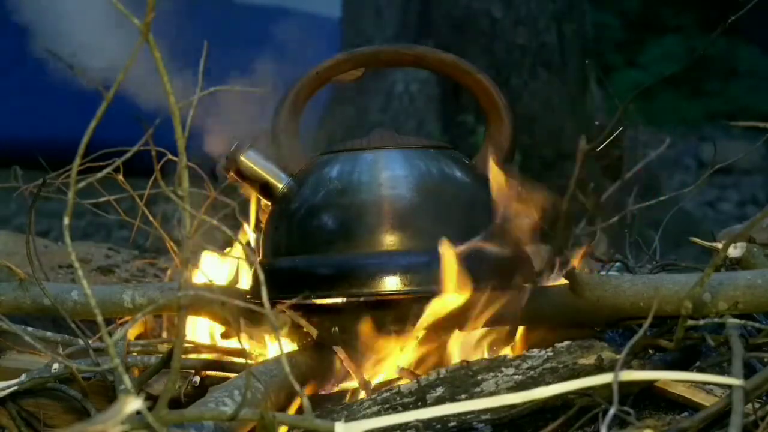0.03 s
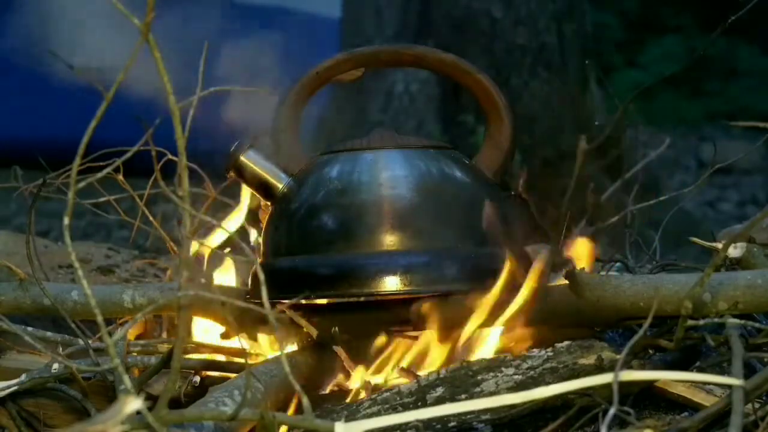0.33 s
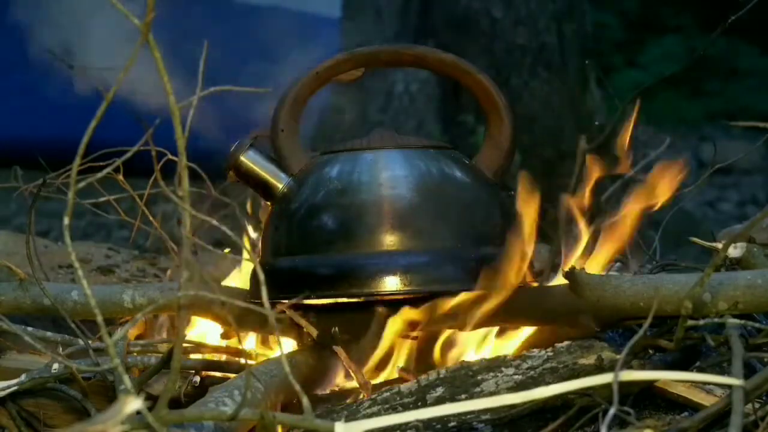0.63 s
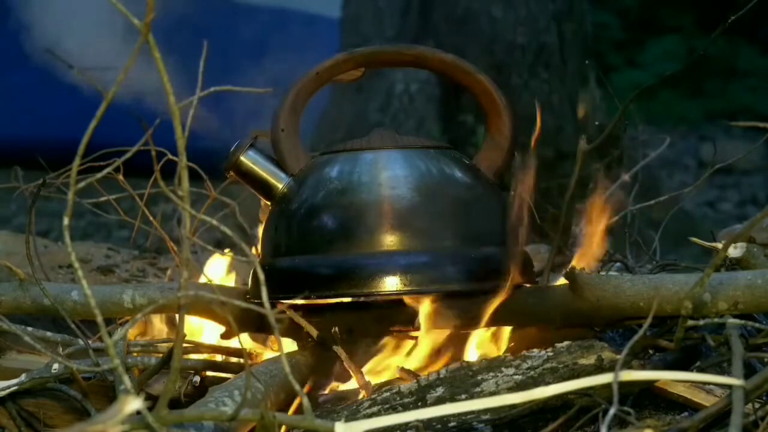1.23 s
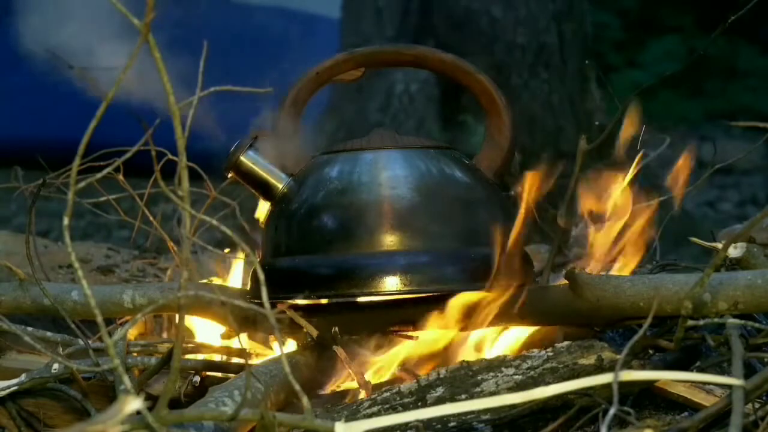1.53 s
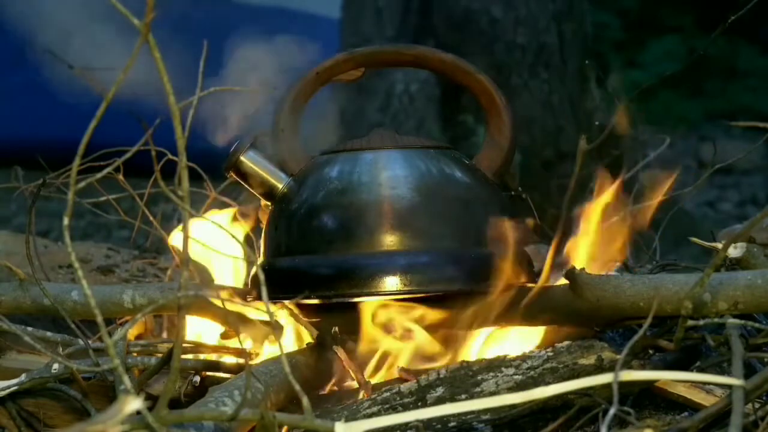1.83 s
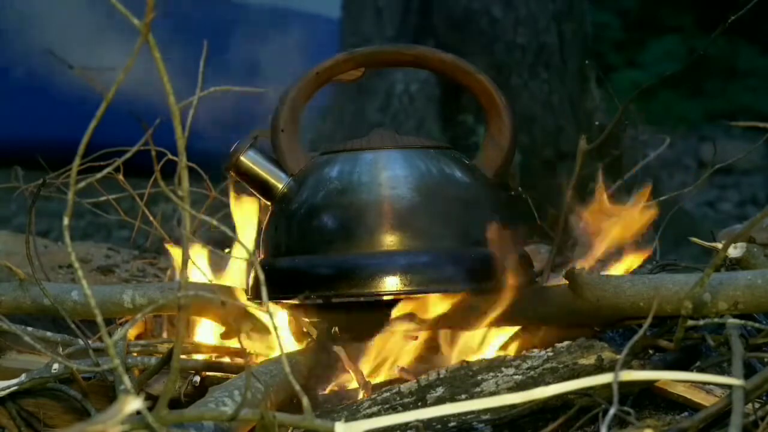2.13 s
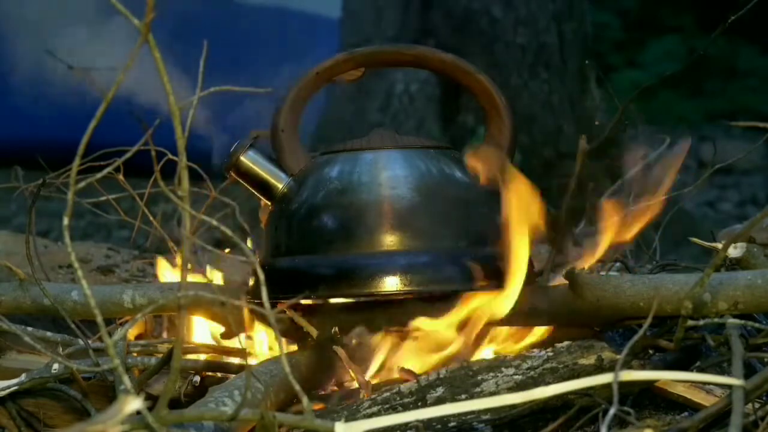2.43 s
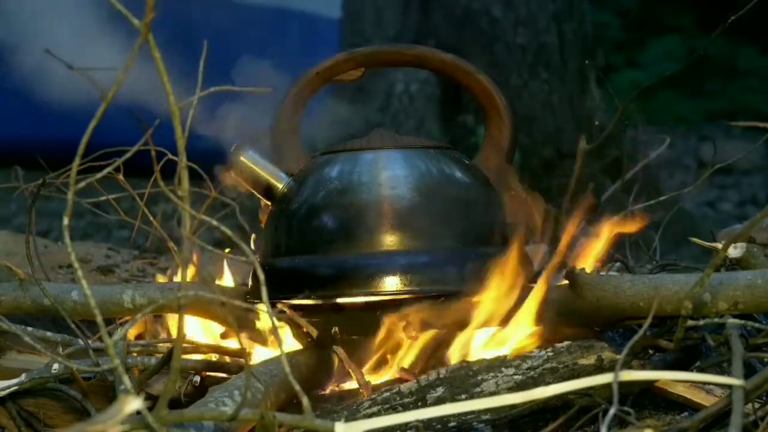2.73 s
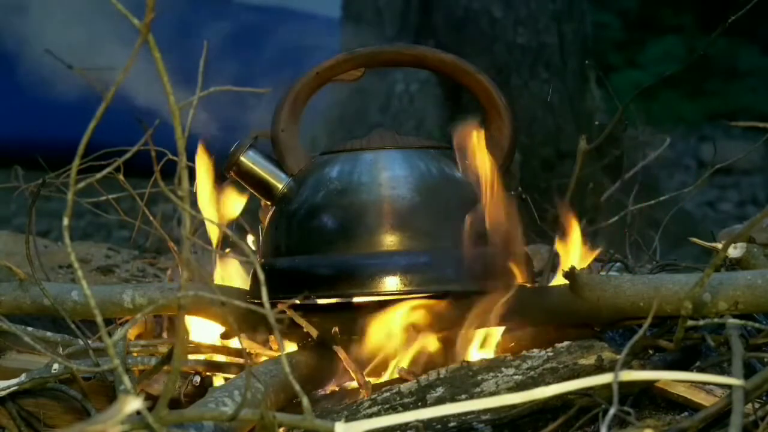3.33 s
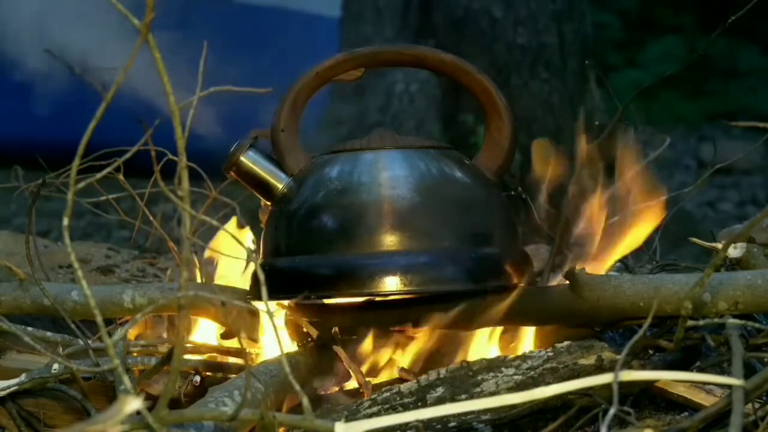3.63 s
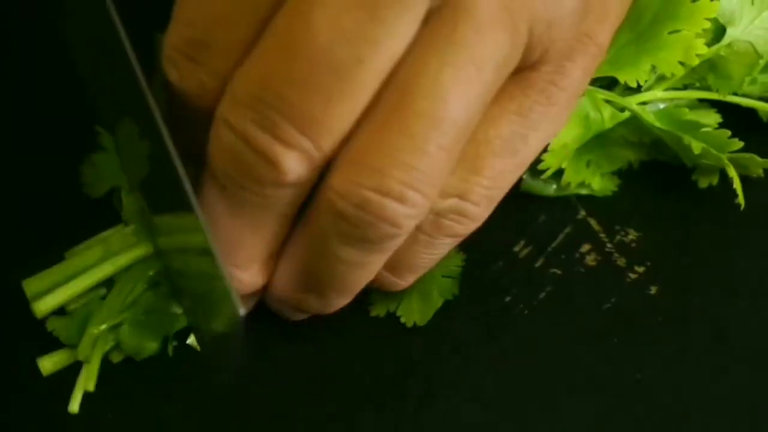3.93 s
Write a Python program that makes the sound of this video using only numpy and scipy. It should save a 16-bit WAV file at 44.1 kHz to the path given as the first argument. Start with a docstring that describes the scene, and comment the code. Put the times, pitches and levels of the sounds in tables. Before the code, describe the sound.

Outdoors, a boiling kettle holds a shrill whistle that wanders in pitch, with hiss and a few brief spits of steam. A campfire rumbles and crackles faintly below it, and everything gets louder just before the end.

```python
"""Outdoors on a campfire, a steel kettle whistles as steam rushes through the cap on its spout.
The flow surges and sags, so the tone wanders around 3 kHz. Harder flow makes it higher, louder and
hoarser, with more hiss and a rasp halfway between the overtones. Now and then wet steam spits.
Below it the flames rumble softly and twigs crackle; the level steps up just before the end."""
import sys
import numpy as np
from scipy import signal
from scipy.fft import rfft, irfft, next_fast_len
from scipy.io import wavfile
from scipy.ndimage import map_coordinates

SR = 44100
rng = np.random.default_rng(int(sys.argv[2]) if len(sys.argv) > 2 else 0)


def wrap_up_sound(samples):
    """Save the sound to the file named by the first command line argument, as 16-bit audio."""
    columns = np.atleast_2d(samples).T
    # keep every value between -1 and 1, then stretch to whole-number steps
    tamed = np.clip(columns, -1, 1)
    steps = np.round(tamed * 32767).astype(np.int16)
    wavfile.write(sys.argv[1], SR, steps)


N = 176400  # 4 seconds


def amp(db):
    """Turn decibels into a gain."""
    return 10 ** (np.asarray(db) / 20)


def unit(x):
    """Scale a signal to an average power of 1."""
    return x / np.sqrt(np.mean(np.abs(x) ** 2) + 1e-20)


def read(rows, at):
    """Look up `at` in a table's first column; give the other columns, joined by straight lines."""
    key, *columns = np.transpose(rows)
    return [np.interp(at, key, column) for column in columns]


def wobble(rate):
    """A smooth curve through `rate` random points a second, mostly between -1 and 1."""
    return map_coordinates(rng.standard_normal(N // 8), [np.arange(N) * rate / SR], mode="wrap")


def filtered(x, gain_at):
    """Turn each frequency of x up or down by gain_at(hz)."""
    size = next_fast_len(N + SR // 2)
    return irfft(rfft(x, size) * gain_at(np.fft.rfftfreq(size, 1 / SR)), size)[..., :N]


def pan(lean_db):
    """Left and right gains that make the left ear lean_db louder."""
    return amp(np.array([[.5], [-.5]]) * lean_db)


def white(side_db=-12.5):
    """Plain noise, nearly the same in both ears."""
    mid, side = rng.standard_normal((2, N))
    return np.array([mid + amp(side_db) * side, mid - amp(side_db) * side])


def noise(colour):
    """Stereo noise shaped by a table of (frequency [Hz], relative level [dB])."""
    freqs, db = np.transpose(colour)
    return unit(filtered(white(), lambda hz: amp(np.interp(np.log(hz + 1), np.log(freqs), db))))


def noise_band(phase, width_hz, edge_hz=266):
    """A narrow band of noise that follows a moving pitch and falls off faster beyond edge_hz."""
    shape = lambda hz: 1 / np.sqrt((1 + (hz / width_hz) ** 2) * (1 + (hz / edge_hz) ** 4))
    return unit(filtered(white(), shape) * np.cos(phase) + filtered(white(), shape) * np.sin(phase))


def whistle(t, pitch, phase):
    """Steam sounds a clean tone and its overtones in the spout cap; the highest sputter most."""
    # strength of the tones at 1, 2 and 3 times the pitch (time [s], level [dB])
    first_level = [(0.0, -23.5), (0.1, -20.5), (0.18, -26), (0.6, -24.5), (0.63, -27), (0.84, -23),
                   (1.06, -27.5), (1.12, -24.5), (1.25, -27), (1.49, -22), (1.59, -26), (1.74, -23.5),
                   (1.86, -24.5), (1.91, -21.5), (2.02, -26.5), (2.19, -21.5), (2.69, -25.5), (2.82, -22),
                   (2.89, -26.5), (3.09, -23), (3.24, -25.5), (3.35, -23), (3.42, -27.5), (3.73, -24),
                   (3.79, -26), (3.92, -25)]
    second_level = [(0.0, -33), (0.04, -31), (0.05, -43), (0.14, -32), (0.34, -36), (0.37, -31),
                    (0.71, -37), (0.73, -31.5), (1.18, -33.5), (1.23, -31), (1.53, -37), (1.66, -33.5),
                    (1.7, -38.5), (1.86, -31.5), (1.91, -39), (1.94, -30.5), (2.08, -32.5), (3.32, -32.5),
                    (3.33, -38.5), (3.47, -41), (3.49, -57), (3.53, -41.5), (3.57, -48.5), (3.6, -33),
                    (3.76, -30.5), (3.92, -33.5)]
    third_level = [(0.0, -37.5), (0.12, -35.5), (0.24, -42.5), (0.29, -37.5), (1.03, -42.5), (1.09, -34),
                   (1.31, -38), (1.41, -35.5), (1.56, -41.5), (1.62, -37.5), (2.49, -38.5), (2.51, -47),
                   (2.6, -42), (2.63, -49), (2.71, -39.5), (3.1, -36), (3.35, -41.5), (3.47, -54.5),
                   (3.5, -44), (3.67, -35), (3.76, -39.5), (3.92, -42.5)]
    # tones at 3, 4 and 5 times the pitch (level above third_level [dB], sputter [dB])
    upper_tones = [(-0.5, 1.1), (-18.5, 2.5), (-27, 3.5)]
    # how much louder the left ear is (pitch [Hz], first tone [dB], second tone [dB])
    lean = [(2820, 1.2, 2), (2986, 2.4, -0.5), (3082, -1.5, 5), (3130, -1, -3.5), (3280, -6.5, -2),
            (3170, -3, 2)]
    first_lean, second_lean = read(lean, pitch)
    left_lead = 0.31 * np.array([[.5], [-.5]])  # radians: the left ear's wave comes a little early
    tone = lambda multiple, db: amp(db) * np.sqrt(2) * np.sin(multiple * phase + left_lead)
    first_db = read(first_level, t)[0] + 0.42 * wobble(40)
    second_db = read(second_level, t)[0] + 1 + 0.68 * wobble(60)
    sound = pan(first_lean) * tone(1, first_db) + pan(second_lean) * tone(2.0002, second_db)
    for multiple, (offset_db, sputter_db) in enumerate(upper_tones, 3):
        sway = pan(3 * wobble(7.3))
        level_db = read(third_level, t)[0] + offset_db + sputter_db * wobble(35.03)
        sound += sway * tone(multiple, level_db)
    shimmer = amp(0.5 * wobble(170))
    return sound * shimmer


def hoarseness(surge_db, phase):
    """Swirling steam blurs each tone; at high flow a flickering rasp grows halfway between them."""
    # breathy noise around 1, 2, 3, 4 and 5 times the pitch, at usual flow (level [dB])
    blur_levels = [-51, -47, -53, -61, -74]
    # rasp at 1.5, 2.5, 3.5 and 4.5 times the pitch, at usual flow (level [dB])
    rasp_levels = [-54, -45, -52, -62.5]
    blur = sum(amp(db) * noise_band(k * phase, width_hz=76) for k, db in enumerate(blur_levels, 1))
    rasp = sum(amp(db) * noise_band((k + .5) * phase, width_hz=55)
               for k, db in enumerate(rasp_levels, 1))
    rasp_db = 1.53 * surge_db + 2.8 * wobble(90)
    return blur * amp(.5 * surge_db) + rasp * amp(rasp_db)


def steam_hiss(surge_db, spit_gain):
    """The jet hisses louder the more it swirls, and flares with each spit."""
    # tone colour of the hiss (frequency [Hz], relative level [dB])
    colour = [(150, -33), (380, -21), (2100, -26), (2700, -6.5), (3400, 4), (4050, -18), (4700, -8.5),
              (5100, -6), (5500, -12), (6100, -6), (6750, -18), (7250, -4.5), (7900, 2), (8600, -3),
              (9900, -7), (10900, -5.5), (12700, -24), (14000, -10), (15400, -30)]
    flow_gain = amp(-44.5 + 1.05 * surge_db + .6 * wobble(47))
    return noise(colour) * np.hypot(flow_gain, spit_gain)  # hypot adds their powers


def flames(t):
    """Fluttering flames make a low rumble, the same in both ears."""
    # tone colour of the rumble (frequency [Hz], relative level [dB])
    colour = [(20, -22), (50, -10), (80, 2), (115, -5), (170, -14.5), (400, -30)]
    # strength of the flames (time [s], level [dB])
    level = [(0, -70), (.7, -74), (1.1, -68.5), (2.35, -73.5), (2.6, -64.5), (3, -69), (3.4, -65.5),
             (4, -63.5)]
    rumble = unit(noise(colour).mean(axis=0))
    return rumble * amp(read(level, t)[0] + 2.2 * wobble(9.16))


def soft_rush(t, pitch):
    """The steam cloud and the fire rush softly, with a puff whenever the cloud thickens."""
    # tone colour of the rush (frequency [Hz], relative level [dB])
    colour = [(40, -10), (200, -4), (400, -1), (800, -3), (1400, -3.5), (2100, -3.5), (8000, -22)]
    # puffs of steam (time [s], level [dB])
    puffs = [(.09, -69), (1.73, -61.5), (2.14, -65), (3.12, -68), (3.81, -68.5)]
    puff_width_s, rest_hz, db_per_hz = 0.09, 3050, 0.0128
    puff_gain = sum(amp(db) * np.exp(-((t - peak_s) / puff_width_s) ** 2) for peak_s, db in puffs)
    flow_db = -68 + db_per_hz * (pitch - rest_hz)  # a higher pitch means more steam
    return noise(colour) * np.hypot(puff_gain, amp(flow_db + .9 * wobble(38)))


def crackles(t, per_second=15, fade_s=0.0034):
    """Burning twigs pop at random; each pop is a burst of noise that falls 60 dB in fade_s."""
    # tone colour of a pop (frequency [Hz], relative level [dB])
    colour = [(200, -27), (1200, 21), (6000, -2), (15000, -19)]
    pops = rng.random(N) < per_second / SR
    pop_db = -69.5 + 6 * np.minimum(rng.exponential(size=N), 3)  # most are faint, a few stand out
    fade = amp(-60 * t[:SR // 10] / fade_s)
    return signal.fftconvolve(pops * amp(pop_db), fade)[:N] * noise(colour)


def spits(t, rise_s=.0006, fade_s=.06):
    """Wet steam spits in the spout: jumps of gain for the hiss, each falling 60 dB in fade_s."""
    # spits of wet steam (time [s], level [dB])
    bursts = [(.98, -38), (1.262, -45), (1.519, -38), (2.12, -29), (2.168, -40), (3.067, -32.5),
              (3.807, -36)]
    gain = np.zeros(N)
    for start_s, db in bursts:
        age = np.maximum(t - start_s, 0)
        gain += amp(db - 60 * age / fade_s) * (1 - np.exp(-age / rise_s))
    return gain


def scene():
    """The steam drives the whistle, its hoarseness and the hiss, over the fire."""
    # the whistle's note, which follows the steam flow (time [s], pitch [Hz])
    note = [(0.0, 3150), (0.03, 3145), (0.08, 3275), (0.11, 3140), (0.12, 3169), (0.17, 3061), (0.25, 3064),
            (0.28, 2962), (0.33, 2924), (0.41, 3057), (0.44, 2984), (0.46, 3031), (0.51, 2942),
            (0.56, 2969), (0.57, 3052), (0.59, 3061), (0.61, 3000), (0.69, 2946), (0.78, 3055), (0.8, 3019),
            (0.86, 3072), (0.97, 2951), (0.99, 3002), (1.04, 2897), (1.13, 2992), (1.23, 2957),
            (1.24, 3013), (1.29, 2970), (1.31, 3044), (1.38, 2977), (1.42, 3083), (1.49, 3140),
            (1.57, 3006), (1.65, 2984), (1.69, 3157), (1.75, 3146), (1.78, 3103), (1.86, 3080), (1.9, 3186),
            (1.99, 3037), (2.02, 2948), (2.06, 3069), (2.11, 3043), (2.14, 3133), (2.25, 3122),
            (2.31, 3046), (2.48, 3108), (2.51, 3013), (2.68, 2913), (2.72, 3058), (2.78, 3143),
            (2.88, 3040), (3.07, 3071), (3.1, 3127), (3.2, 2951), (3.23, 2931), (3.32, 3091), (3.34, 3148),
            (3.39, 3013), (3.47, 2907), (3.51, 2945), (3.57, 2940), (3.67, 3052), (3.78, 3037), (3.8, 2955),
            (3.86, 2955), (3.9, 3014), (4.0, 2995)]
    # how hard the jet swirls, given as a loudness (time [s], level [dB])
    swirl = [(0, -45), (.08, -42), (.2, -45), (.34, -52.5), (.41, -44.5), (.54, -49), (.59, -46.5),
             (.63, -51.5), (.75, -46.5), (.9, -45), (1.03, -51.5), (1.2, -48.5), (1.33, -46), (1.38, -49.5),
             (1.44, -43), (1.55, -43.5), (1.6, -49), (1.7, -43.5), (1.92, -44.5), (1.99, -45),
             (2.035, -54.5), (2.07, -47.5), (2.11, -48.5), (2.14, -43.5), (2.48, -45), (2.53, -52),
             (2.68, -50.5), (2.76, -42.5), (2.94, -46), (3.1, -41), (3.22, -51.5), (3.33, -45),
             (3.42, -49.5), (3.53, -54.5), (3.62, -48.5), (3.72, -44.5), (3.85, -49.5), (3.93, -47.5),
             (3.96, -46), (4, -51)]
    flutter_hz, jitter_hz, usual_swirl_db = 9, 9.4, -44
    t = np.arange(N) / SR
    pitch = read(note, t)[0] + flutter_hz * wobble(110)
    shaken_pitch = pitch + jitter_hz * wobble(450)  # the swirls shake the pitch quickly
    phase = 2 * np.pi * np.cumsum(shaken_pitch) / SR
    surge_db = read(swirl, t)[0] - usual_swirl_db
    steam = (hoarseness(surge_db, phase) + steam_hiss(surge_db, spits(t))) * pan(lean_db=1.3)
    return whistle(t, pitch, phase) + steam + flames(t) + soft_rush(t, pitch) + crackles(t)


def record(dry):
    """The level steps up suddenly near the end, and the very highest treble is cut off."""
    step_at_s, step_db, rise_s, top_hz = 3.9415, 6.5, .0006, 15500
    rise = np.clip((np.arange(N) / SR - step_at_s) / rise_s, 0, 1)
    return filtered(dry * amp(step_db * rise), lambda hz: hz < top_hz)


dry = scene()
out = record(dry)
wrap_up_sound(out)
```